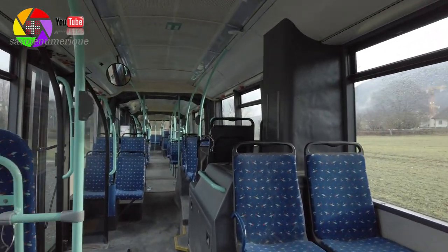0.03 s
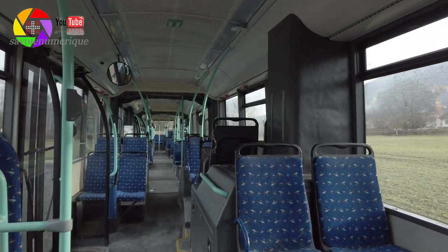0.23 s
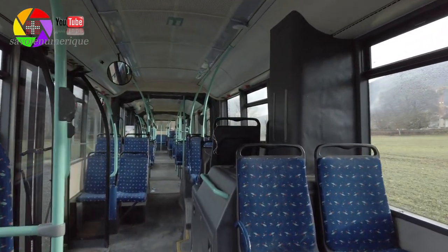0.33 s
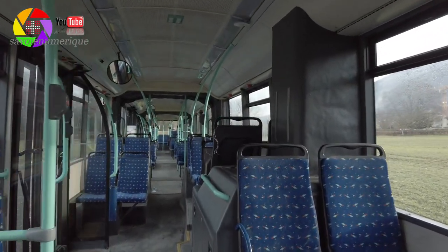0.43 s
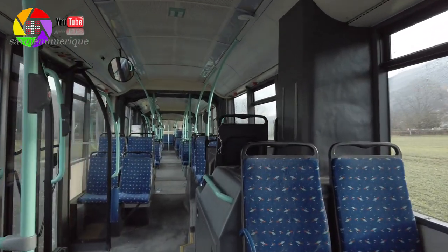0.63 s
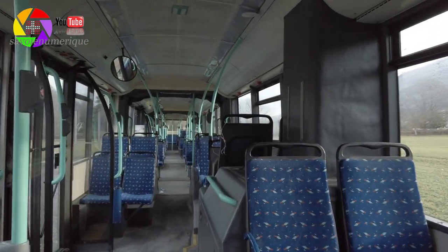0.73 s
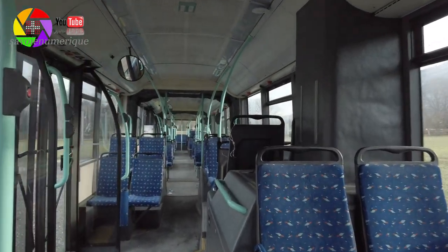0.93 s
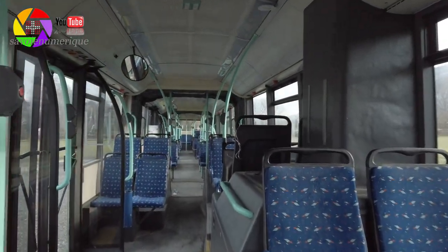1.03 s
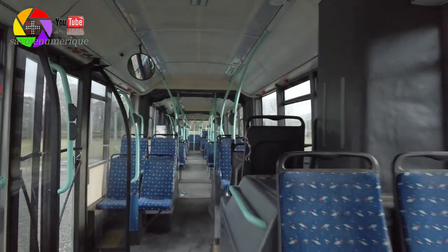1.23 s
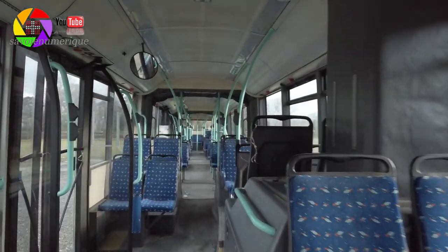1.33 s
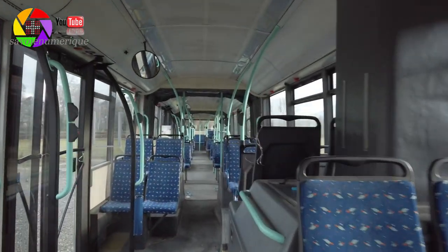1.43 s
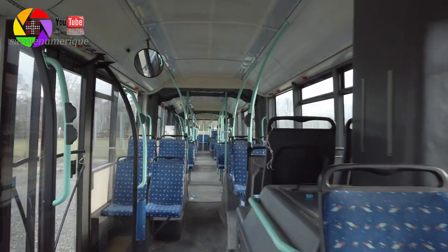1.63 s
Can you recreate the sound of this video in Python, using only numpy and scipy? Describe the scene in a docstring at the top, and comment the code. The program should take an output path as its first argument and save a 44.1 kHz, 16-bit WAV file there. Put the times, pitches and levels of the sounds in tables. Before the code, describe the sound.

One heavy footstep on the hollow floor of an empty parked bus. Clothes rustle faintly, with a light tick at 0.1 s and a barely audible tread at 0.15. At 0.23-0.27 heel and sole knock in quick succession, with deep boom and short panel clatter. A gritty scuff follows near 0.5, then a soft muffled double footfall at 1.35, rustling rising by 1.6, over low handling rumble and faint hiss.

```python
"""One heavy step, heel then sole, knocks the hollow floor of an empty parked bus and sets its body booming.
The floor and boom are fading sine waves; the knocks add short thumps, cracks and clattering noise.
A shoe scuff is noise with a slow fade; soft steps before and after it are low, muffled floor tones.
Small ticks, rustling clothes, a low rumble and a faint hiss, all made of coloured noise, lie under it."""
import sys
import numpy as np
from scipy import signal
from scipy.fft import rfft, irfft, next_fast_len
from scipy.io import wavfile
from scipy.ndimage import uniform_filter1d, map_coordinates

SR = 44100
rng = np.random.default_rng(int(sys.argv[2]) if len(sys.argv) > 2 else 0)


def bounce(signal):
    """Save signal as a 16-bit WAV file at the path given by the first command-line argument."""
    frames = np.transpose(np.atleast_2d(signal))
    limited = np.clip(frames, -1, 1)
    pcm = np.round(limited * 32767).astype(np.int16)
    wavfile.write(sys.argv[1], SR, pcm)


N = 74970  # length in samples, 1.7 s
ATTACK_S = 0.0024  # quick onset shared by cracks, ticks and soft steps


def amp(db):
    """Turn decibels into a gain."""
    return 10 ** (np.asarray(db) / 20)


def unit(x):
    """Scale to an rms of 1."""
    return x / np.sqrt(np.mean(x ** 2) + 1e-20)


def along(points, hz):
    """Read (frequency [Hz], value) points at any frequency, on a log axis."""
    point_hz, values = np.transpose(points)
    return np.interp(np.log(hz + 1), np.log(point_hz + 1), values)


def curves(rows):
    """Draw one curve, a value per sample, for each column after the time."""
    times, *columns = np.transpose(rows)
    return [np.interp(np.arange(N) / SR, times, column) for column in columns]


def since(s):
    """Count seconds after time s, zero before it."""
    return np.maximum(np.arange(N) / SR - s, 0)


def rise(t, length):
    """Step smoothly from 0 to 1 in length seconds."""
    return np.sin(np.pi / 2 * np.minimum(t / length, 1)) ** 2


def decay(t, t60):
    """Fall by 60 dB in t60 seconds."""
    return np.exp(-np.log(1000) * t / t60)


def wobble(rate):
    """Draw a smooth random curve through rate random points a second."""
    return map_coordinates(rng.standard_normal(2048), [np.arange(N) * rate / SR], mode="wrap")


def filtered(x, response):
    """Multiply the spectrum of x by a response, a function of frequency."""
    size = next_fast_len(N + SR // 2)
    hz = np.fft.rfftfreq(size, 1 / SR)
    return irfft(rfft(x, size) * response(hz), size)[..., :N]


# Stereo width: (frequency [Hz], side level over middle level [dB])
WIDTH_CURVE = [(80, -32.5), (180, -43), (350, -34), (700, -24.5), (1400, -15.5), (2800, -9.5), (5200, -1),
               (7000, 1), (10000, .8), (13500, -0.4)]


def noise(spectrum):
    """Coloured stereo noise of rms 1: centred in the bass, wide in the treble."""
    def response(hz):
        angle = np.arctan(amp(along(WIDTH_CURVE, hz)))
        return amp(along(spectrum, hz)) * [np.cos(angle), np.sin(angle)]

    mid, side = filtered(rng.standard_normal((2, N)), response)
    return unit(np.array([mid + side, mid - side]))


# Depth of the random ripple: (frequency [Hz], depth [dB])
RIPPLE_DEPTH = [(150, -0.5), (500, 3), (2000, 2.5), (5000, 4), (13000, 3.5)]


def ripple(x):
    """Random gain lifts and dips narrow bands, in patches that shift with time."""
    hz, _, z = signal.stft(x, SR, nperseg=1024)
    patches = rng.standard_normal(z.shape[1:])
    patches = uniform_filter1d(patches, size=3, axis=0)  # smooth over neighbouring frequencies
    patches = uniform_filter1d(patches, size=14, axis=1)  # smooth over time
    depth_db = along(RIPPLE_DEPTH, hz)[:, None]
    power_balance = np.exp((depth_db * np.log(10) / 20) ** 2)  # keeps the average power
    gain = amp(depth_db * unit(patches)) / power_balance
    return signal.istft(z * gain, SR, nperseg=1024)[1][:, :N]


def dying(spectrum, t60s, s):
    """Rippled noise whose frequencies each fade at their own speed from time s."""
    hz, t, z = signal.stft(ripple(noise(spectrum)), SR, nperseg=256)
    t60 = along(t60s, hz)[:, None]
    fade = amp(-60 * np.maximum(t - s, 0) / t60)
    return signal.istft(z * fade, SR, nperseg=256)[1][:, :N]


MODE_SCATTER_DB = 1.06  # random spread of each tone's level


def ring(modes, s, rise_s):
    """A struck floor rings at its own set of pitches, each fading at its own speed from time s."""
    t = since(s)
    out = np.zeros(N)
    for hz, db, t60 in modes:
        level = amp(db + MODE_SCATTER_DB * rng.standard_normal())
        out += level * decay(t, t60) * np.sin(2 * np.pi * hz * t)
    return rise(t, rise_s) * out


# Loudness of the low handling rumble: (time [s], level [dB])
RUMBLE_LEVEL = [(0, -49.5), (.1, -50), (.16, -44.5), (.3, -47), (.7, -47), (.95, -48.5), (1.15, -53),
                (1.4, -45), (1.54, -55), (1.61, -45.5), (1.7, -49)]
# Colour of the rumble: (frequency [Hz], relative level per Hz [dB])
RUMBLE_COLOUR = [(10, -14), (25, -2.5), (45, 7), (70, -1.5), (110, -19.5), (145, -16), (165, -8.5),
                 (190, -18), (300, -29), (600, -31), (1500, -46)]
# Colour of the hiss: (frequency [Hz], relative level per Hz [dB])
HISS_COLOUR = [(100, -9), (500, -3), (1000, -2), (2000, -2), (3500, -9), (4900, -15), (5600, 0), (6600, -3),
               (12500, -49), (16000, -30)]
HISS_DB = -67


def cabin():
    """Low handling rumble that comes and goes, over a faint hiss of constant level."""
    level_db, = curves(RUMBLE_LEVEL)
    rumble = amp(level_db) * noise(RUMBLE_COLOUR)
    hiss = amp(HISS_DB) * noise(HISS_COLOUR)
    return rumble + hiss


# Loudness of the rustle: (time [s], level of the middle [dB], level of the treble [dB])
RUSTLE_LEVEL = [(0, -49, -50), (.025, -51, -57), (.07, -61, -66), (.19, -61.5, -78), (.222, -48, -59),
                (.42, -63.5, -90), (.47, -64, -69), (.6, -60, -65), (.7, -60.5, -68.5), (.79, -65, -63),
                (.84, -59.5, -71), (.9, -55.5, -66.5), (1.05, -60.5, -65), (1.19, -58.5, -59.5),
                (1.31, -68.5, -74.5), (1.42, -64.5, -80), (1.49, -58, -63), (1.56, -58.5, -62),
                (1.62, -51.5, -52), (1.7, -47.5, -54)]
# Loudness of its low part: (time [s], level [dB])
CLOTH_LOW_LEVEL = [(0, -56), (.07, -71.5), (.16, -60), (.45, -72), (.55, -74), (.68, -71), (.85, -61.5),
                   (1.02, -58), (1.15, -62.5), (1.28, -68), (1.48, -63), (1.6, -62), (1.7, -59.5)]
# Colours of the low, middle and treble parts: (frequency [Hz], relative level per Hz [dB])
CLOTH_LOW_COLOUR = [(200, -6.5), (500, 4), (1000, -0.5), (1500, -5), (2200, -22.5), (4000, -14.5)]
CLOTH_MIDDLE_COLOUR = [(200, -13), (500, -24), (1300, -4), (2000, -8.5), (3000, -6), (4300, -1),
                       (5000, 0.5), (5600, 4), (6400, -9), (9000, -22.5)]
CLOTH_TREBLE_COLOUR = [(3000, -41), (6500, 3.5), (8500, -0.5), (10500, 3), (12700, 6.5), (14500, -10),
                       (16000, -27)]
FLUTTER_DB, FLUTTER_PER_S = 1, 69.15  # strength and speed of the flutter


def clothes():
    """Fabric rubs in swells as the walker moves: three bands of noise share one quick flutter."""
    middle_db, treble_db = curves(RUSTLE_LEVEL)
    low_db, = curves(CLOTH_LOW_LEVEL)
    low = amp(low_db) * noise(CLOTH_LOW_COLOUR)
    middle = amp(middle_db) * noise(CLOTH_MIDDLE_COLOUR)
    treble = amp(treble_db) * noise(CLOTH_TREBLE_COLOUR)
    flutter = amp(FLUTTER_DB * wobble(FLUTTER_PER_S))
    return flutter * (low + middle + treble)


# Small handling ticks: (time [s], level [dB], time to fall 60 dB [s])
TICK_EVENTS = [(0.1015, -42.5, 0.084), (1.4545, -56, .02)]
# Colour of a tick: (frequency [Hz], relative level per Hz [dB])
TICK_COLOUR = [(300, -1), (1000, -16), (2800, -12), (4100, 1), (5500, -16), (7000, -33), (8500, -20),
               (9700, 0), (11000, -11), (13500, 1), (15500, -18)]


def tick():
    """Light handling ticks: bright noise that starts at once and quickly dies."""
    out = np.zeros((2, N))
    for s, db, t60 in TICK_EVENTS:
        t = since(s)
        out += amp(db) * rise(t, ATTACK_S) * decay(t, t60) * noise(TICK_COLOUR)
    return out


# Colour of the scuff: (frequency [Hz], relative level per Hz [dB])
SCUFF_COLOUR = [(120, 3), (250, -4), (450, -8), (850, -1.5), (1500, -14), (2400, -7), (3200, -4),
                (3900, 2.5), (4900, -1), (5600, 6), (6400, -6.5), (8000, -4), (10000, -8.5), (13000, -5),
                (15500, -13)]
# How the scuff dies away: (frequency [Hz], time to fall 60 dB [s])
SCUFF_FADE = [(300, 0.38), (2000, 0.32), (5500, 0.35), (8000, 0.21), (14000, 0.19)]
SCUFF_S, SCUFF_RISE_S, SCUFF_HOLD_S, SCUFF_DB = 0.484, 0.03, 0.016, -40
GRIT_DB, GRIT_PER_S = 0.5, 240  # unevenness of the sliding sole, and its speed


def scuff():
    """A sole slides briefly over grit and the cabin carries the sound on."""
    grit_db = GRIT_DB * wobble(GRIT_PER_S)
    stroke = rise(since(SCUFF_S), SCUFF_RISE_S) * amp(SCUFF_DB + grit_db)
    fade_start = SCUFF_S + SCUFF_RISE_S + SCUFF_HOLD_S
    return stroke * dying(SCUFF_COLOUR, SCUFF_FADE, fade_start)


# Soft footfalls: (time [s], level [dB])
SOFT_FOOTFALLS = [(0.149, -54.5), (0.499, -51.5), (1.3421, -38), (1.3613, -42)]
# Tones of the floor under a soft sole: (frequency [Hz], relative level [dB], time to fall 60 dB [s])
SOFT_FLOOR_TONES = [(46.4, 1, .35), (123.6, -1, 0.35), (166.8, 1, 0.51), (204, -1.5, 0.29),
                    (217.3, 3.5, 0.27), (280.6, 1, 0.17), (321, -2, 0.143), (386, -8.5, 0.23)]
SOFT_SOLE_HZ = 398  # the sole muffles what lies above


def soft_step():
    """A gentle footfall wakes only the low tones of the floor; the sole cushions the rest."""
    thuds = sum(amp(db) * ring(SOFT_FLOOR_TONES, s, ATTACK_S) for s, db in SOFT_FOOTFALLS)
    cushion = signal.butter(N=6, Wn=SOFT_SOLE_HZ, fs=SR, output="sos")
    return signal.sosfilt(cushion, thuds)


# The body takes the weight:
# (time [s], frequency [Hz], level [dB], rise [s], time to fall 60 dB [s])
BODY_SWINGS = [(.2565, 28.6, -11, .06, .35), (.446, 25.4, -19, .022, 1.1), (.277, 59, -21.5, .018, .42),
               (.277, 84, -26, .015, .4), (.442, 78, -34, .025, .45)]


def body_boom():
    """The bus body swings slowly under the walker's weight: low tones swell, then fade."""
    out = np.zeros(N)
    for s, hz, db, rise_s, t60 in BODY_SWINGS:
        t = since(s)
        swell = rise(t, rise_s) * decay(since(s + rise_s), t60)
        out += amp(db) * swell * np.sin(2 * np.pi * hz * t)
    return out


# Contacts of the heavy step:
# (time [s], clatter level [dB], crack level [dB], thump frequency [Hz], thump level [dB])
CONTACTS = [(.2262, -25, -28.5, 220, -23), (0.2481, -27.5, -34, 109.5, -17),
            (0.2721, -31.5, -37, 284.3, -14.5)]
# Tones of the floor under a hard heel: (frequency [Hz], relative level [dB], time to fall 60 dB [s])
HARD_FLOOR_TONES = [(107.4, -3, 0.38), (167.8, -12, 0.62), (189.7, -0.5, 0.31), (233.5, -9.5, 0.4),
                    (274, 3, 0.29), (296.8, -2, 0.23), (344.7, 1, 0.24), (376, -9, 0.11), (414, -11, 0.32),
                    (502, -11, 0.25), (535.3, -6.5, 0.34), (605, -12.5, 0.21), (655.4, -14.5, 0.33),
                    (699, -11.5, 0.26), (765, -21, 0.15), (885, -21, 0.22), (1090, -21, 0.19)]
# Colour of the shaken panels and fittings: (frequency [Hz], relative level per Hz [dB])
CLATTER_COLOUR = [(40, -3), (100, -9.5), (250, 0), (500, -3.5), (750, -10.5), (1000, -16), (1800, -22),
                  (2600, -22), (3600, -23.5), (4400, -20), (6000, -22), (7500, -24.5), (10000, -31.5),
                  (13000, -32), (15500, -50)]
# How the panels die away: (frequency [Hz], time to fall 60 dB [s])
CLATTER_FADE = [(100, 0.53), (300, 0.4), (700, .42), (2000, .41), (5000, .38), (9000, 0.28), (14000, 0.34)]
# Colour of the crack: (frequency [Hz], relative level per Hz [dB])
CRACK_COLOUR = [(500, -19), (2500, -16), (3600, -24), (4300, 7.5), (6000, 9), (8000, -23), (15000, -36)]
FLOOR_DB, FLOOR_BUILD_S = -18, 0.037
THUMP_RISE_S, THUMP_T60_S = 0.006, 0.033
CLATTER_ATTACK_S, CRACK_T60_S = 0.0045, 0.048


def heavy_step():
    """The floor's ring builds as the foot rolls down; each contact cracks, thumps and shakes the panels."""
    first_contact_s = CONTACTS[0][0]
    floor = amp(FLOOR_DB) * ring(HARD_FLOOR_TONES, first_contact_s, FLOOR_BUILD_S)
    out = np.zeros((2, N)) + floor
    for s, clatter_db, crack_db, thump_hz, thump_db in CONTACTS:
        t = since(s)
        thump_shape = rise(t, THUMP_RISE_S) * decay(since(s + THUMP_RISE_S), THUMP_T60_S)
        thump = thump_shape * np.sin(2 * np.pi * thump_hz * t)
        clatter = rise(t, CLATTER_ATTACK_S) * dying(CLATTER_COLOUR, CLATTER_FADE, s)
        crack = rise(t, ATTACK_S) * decay(t, CRACK_T60_S) * noise(CRACK_COLOUR)
        out += amp(thump_db) * thump + amp(clatter_db) * clatter + amp(crack_db) * crack
    return out


def scene():
    """Add all sources together, with the background unevenly rippled."""
    background = ripple(cabin() + clothes())
    small_sounds = tick() + scuff() + soft_step()
    return background + small_sounds + body_boom() + heavy_step()


TOP_HZ = 15800


def record(dry):
    """The recorder keeps nothing from its band limit upward."""
    return filtered(dry, lambda hz: hz < TOP_HZ)


dry = scene()
out = record(dry)
bounce(out)
```